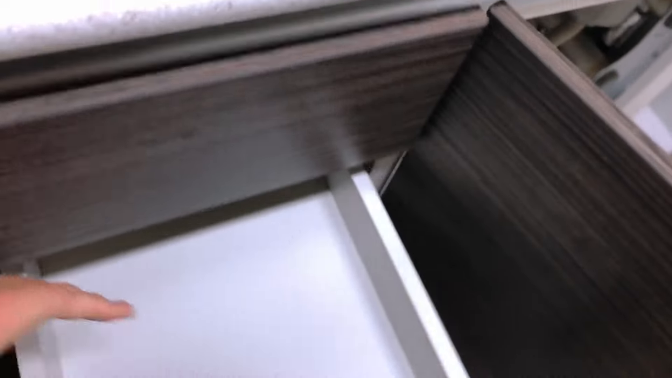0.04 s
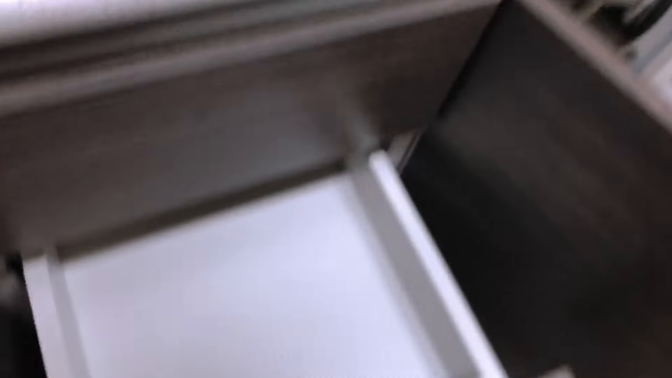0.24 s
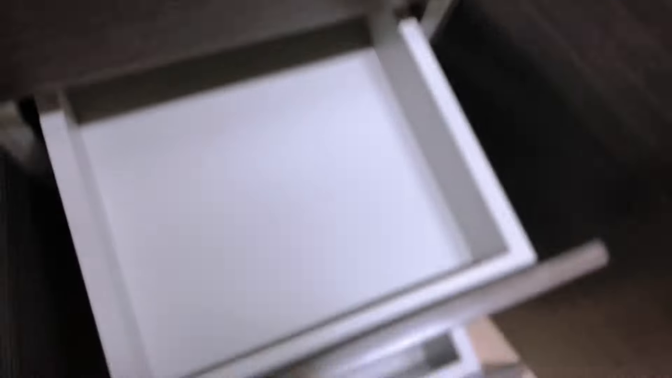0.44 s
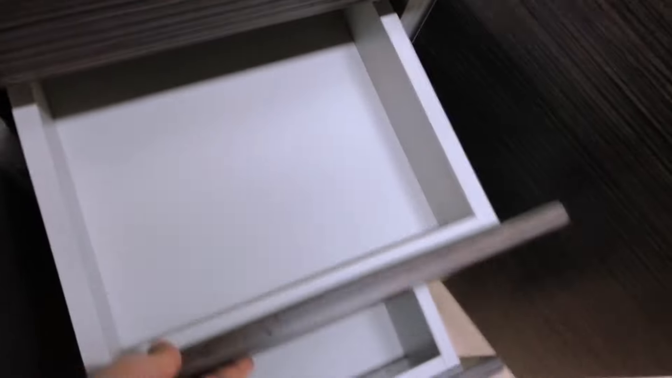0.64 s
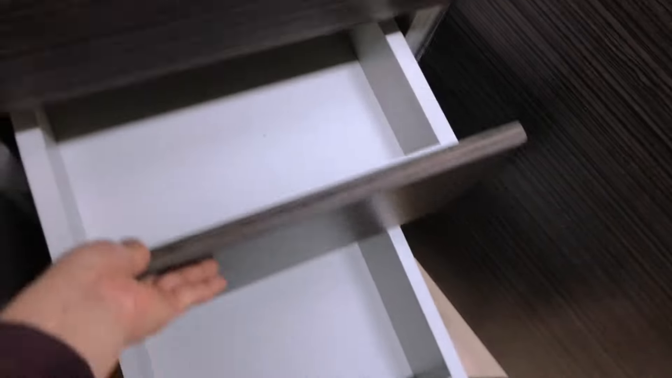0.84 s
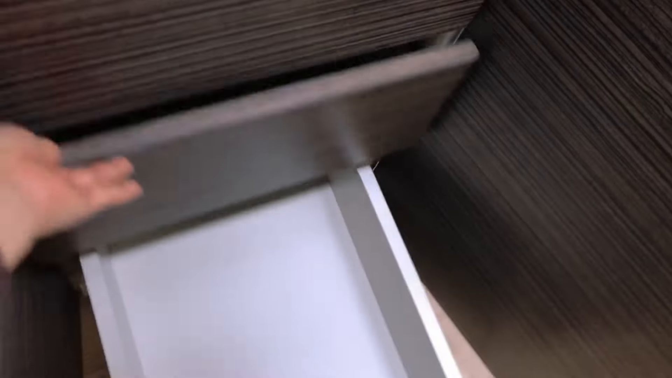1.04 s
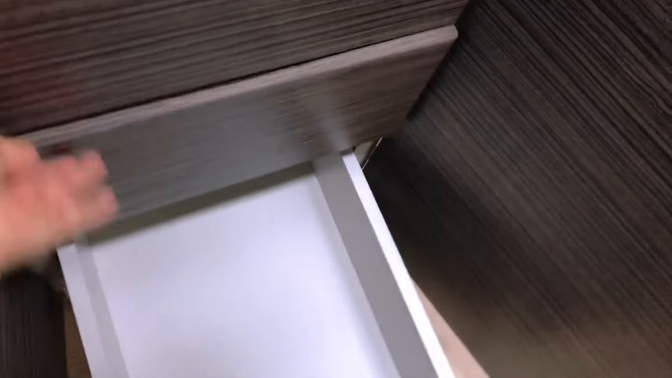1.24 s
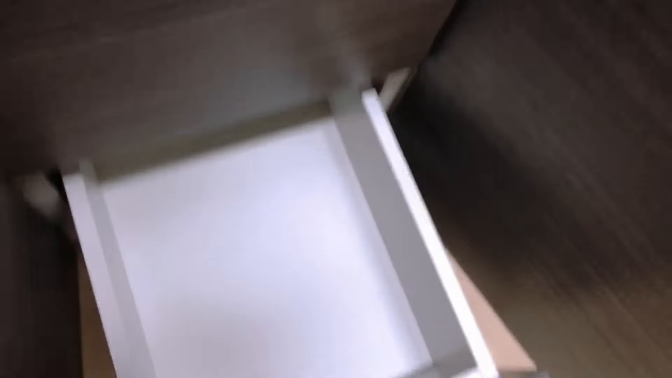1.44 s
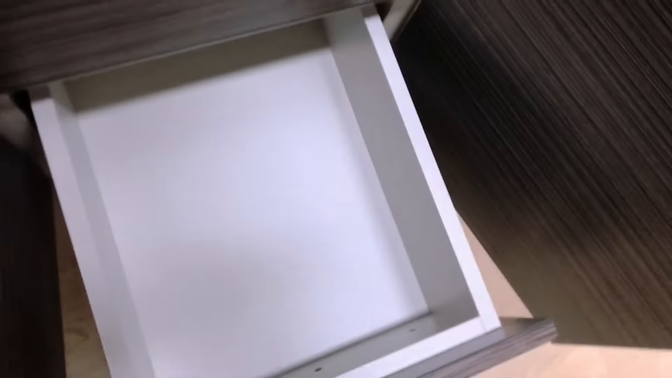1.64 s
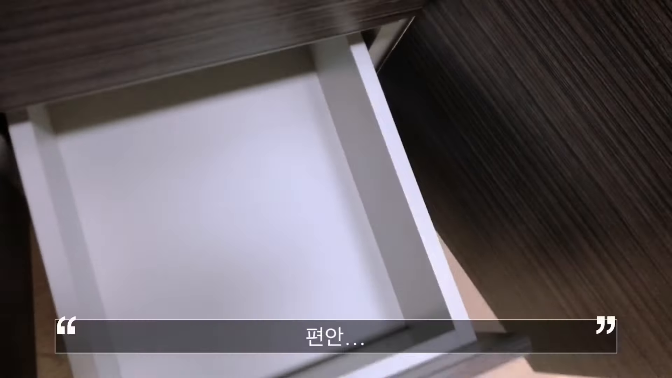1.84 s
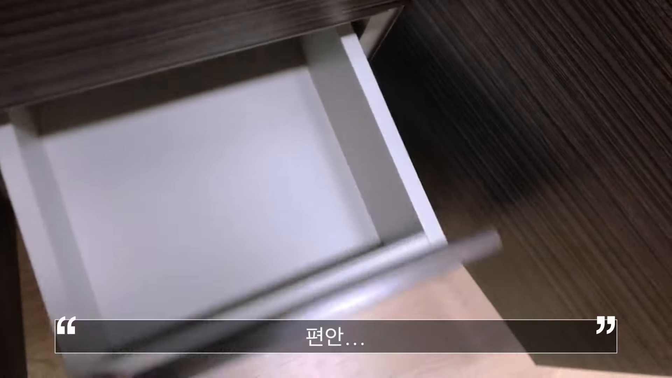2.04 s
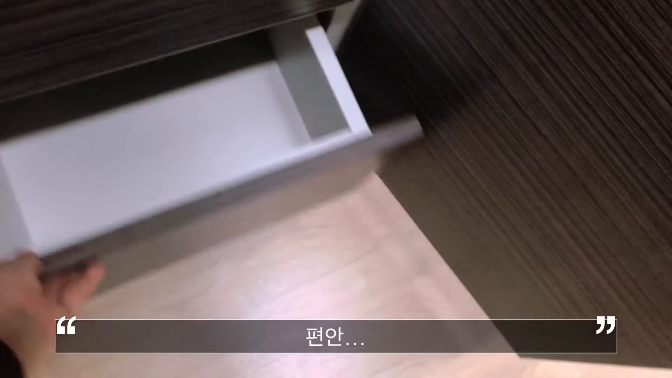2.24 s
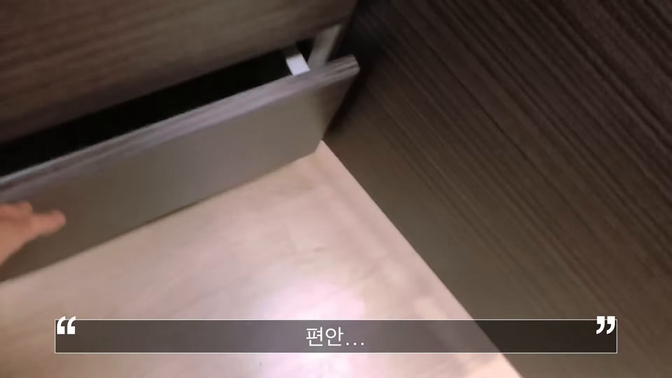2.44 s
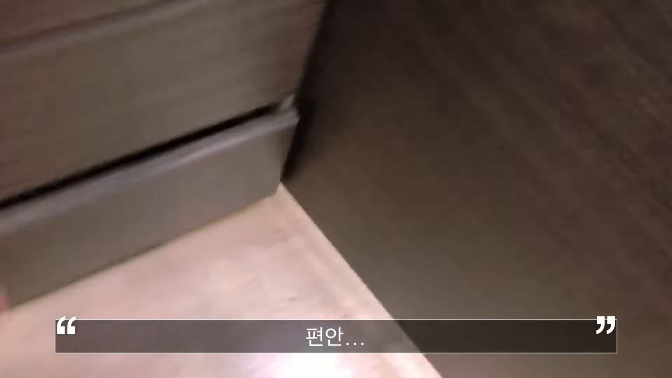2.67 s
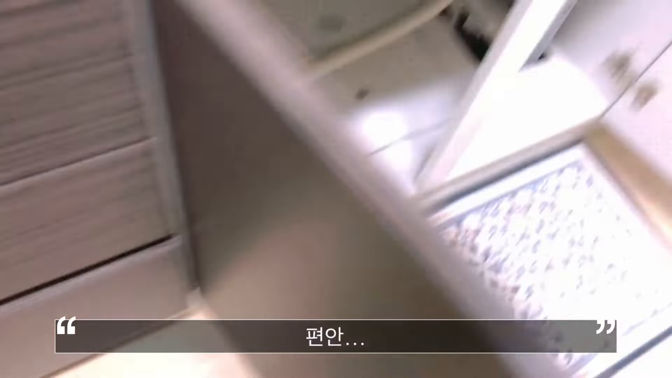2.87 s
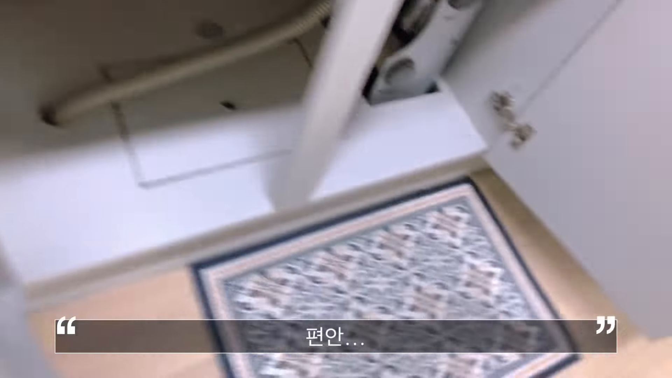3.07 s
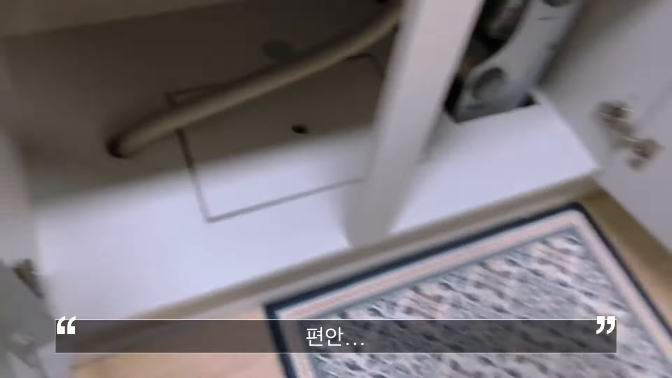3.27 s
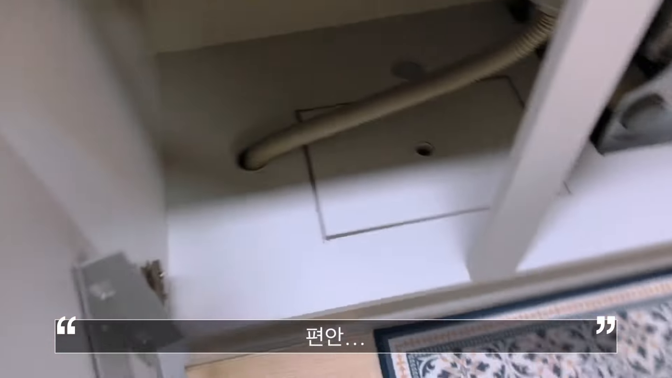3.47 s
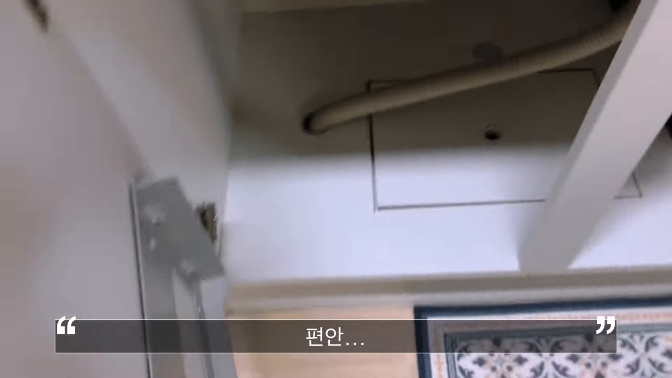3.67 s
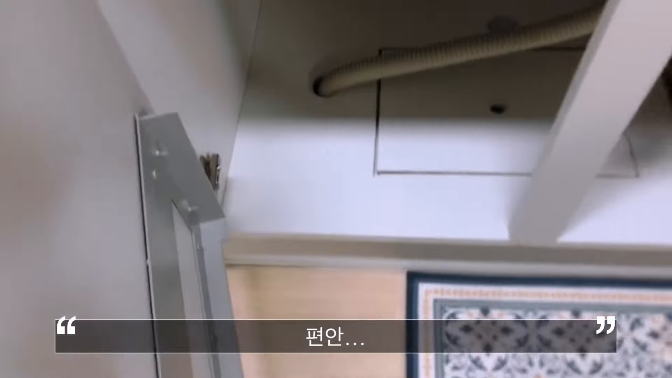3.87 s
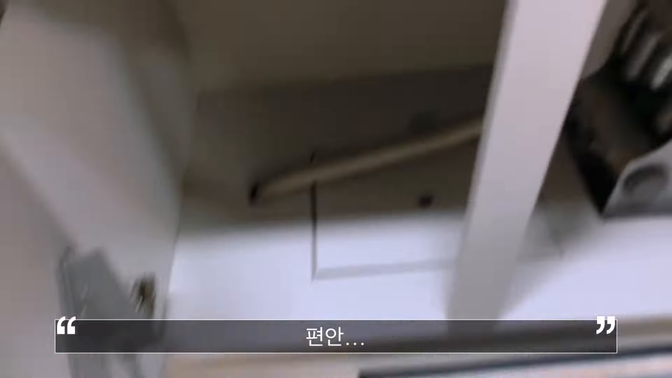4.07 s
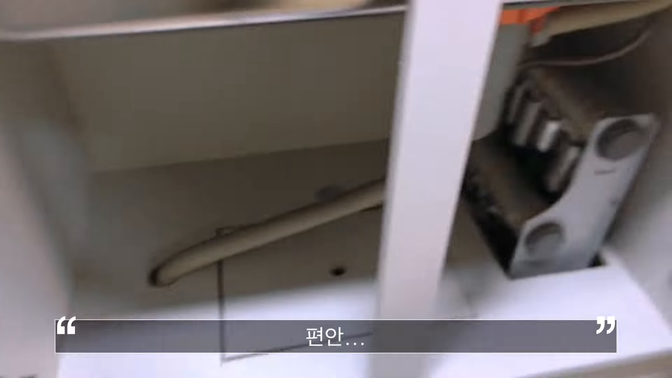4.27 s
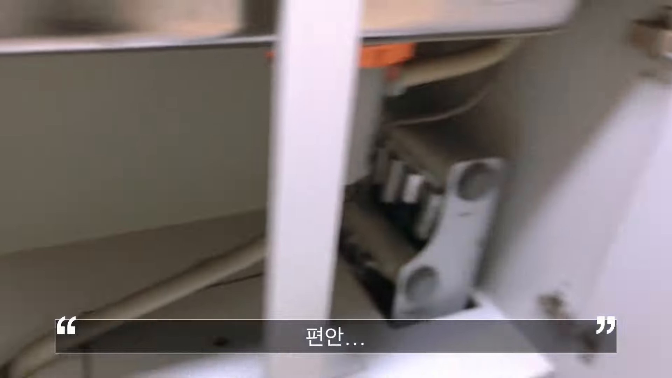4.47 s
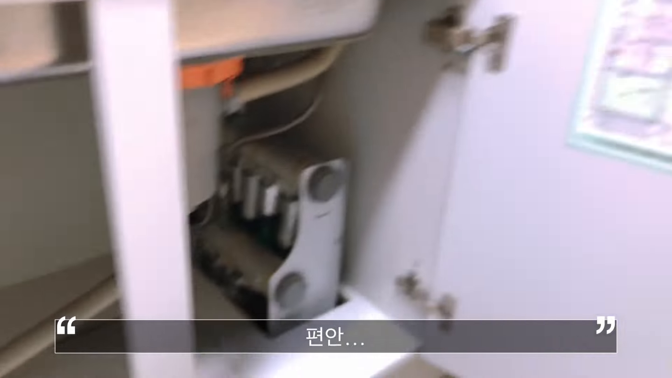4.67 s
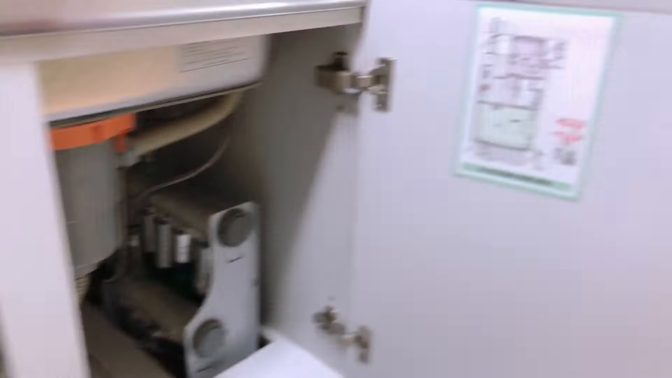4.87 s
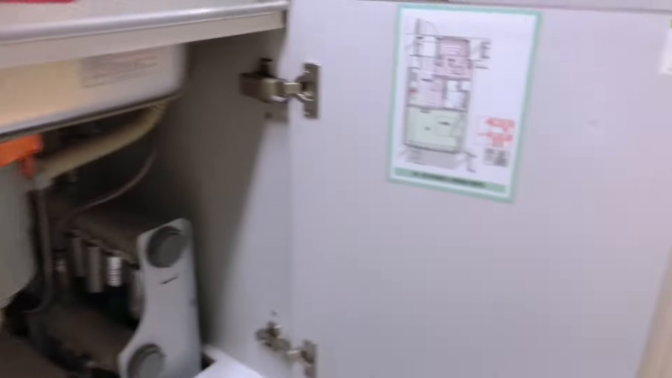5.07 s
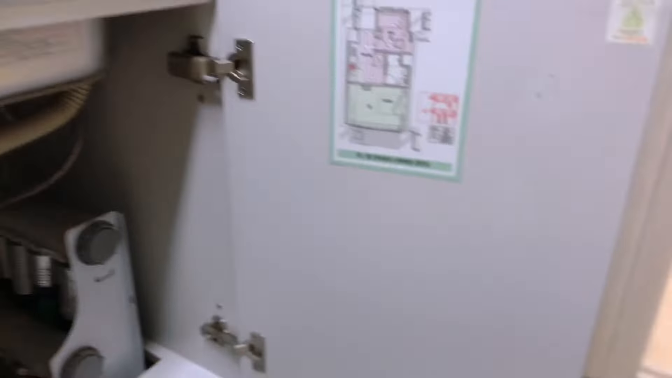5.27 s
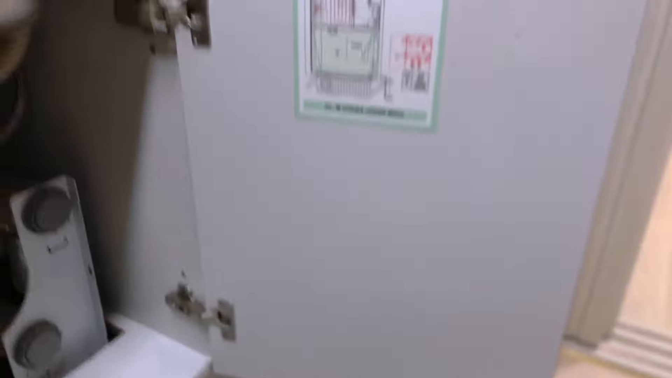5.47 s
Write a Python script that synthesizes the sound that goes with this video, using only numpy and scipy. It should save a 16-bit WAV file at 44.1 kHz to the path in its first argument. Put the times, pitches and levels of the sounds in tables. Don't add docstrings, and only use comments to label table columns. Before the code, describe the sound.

Close to the microphone, an empty wooden drawer slams shut at once. A second rolls in with ticks and bumps and bangs; a third jolts and rattles along its metal rail before a hard final slam. A cupboard door then clacks open, and soft slipper scuffs fade over a hard floor. Bare kitchen walls add a short tail above faint appliance hum.

```python
import sys
import numpy as np
from scipy import signal
from scipy.fft import rfft, irfft
from scipy.io import wavfile
from scipy.ndimage import uniform_filter1d

SR = 44100
rng = np.random.default_rng(int(sys.argv[2]) if len(sys.argv) > 2 else 0)


def dump_mix(stems):
    frames = np.atleast_2d(stems).T
    limited = np.clip(frames, -1, 1)
    pcm = np.round(limited * 32767).astype(np.int16)
    wavfile.write(sys.argv[1], SR, pcm)


def voltage_ratio(decibels):
    exponent = np.asarray(decibels, float) / 20
    return 10 ** exponent


N = 242991

# freq_hz, density_db
ROOM_TONE = [(20, -14.5), (46, 4.5), (155, -14), (410, -10), (480, -20), (1750, -23.5), (3500, -36),
             (15500, -50)]
ROOM_TONE_DB = -49
# freq_hz, level_db
HUM_LINES = [(180, -69), (201, -66), (258, -72), (304, -69), (405, -71), (609, -71), (1028, -78)]
# time_s, level_db
WHINE_LEVEL = [(0.1, -79), (4.4, -77), (4.6, -74), (5.3, -76)]
WHINE_HZ = 2584
# freq_hz, t60_s
ROOM_DECAY = [(60, 0.23), (150, 0.31), (400, 0.34), (1000, 0.29), (2000, 0.31), (4000, 0.22), (7500, 0.25),
              (13500, 0.21)]
ROOM_DB = -8.5

# freq_hz, density_db
FRICTION = [(710, -42.5), (1200, -15), (1640, -3), (2860, -3.5), (3220, -4), (9310, -8.5), (14700, -16),
            (16000, -12)]
# start_s, peak_db, rise_s, hold_s,
# dull_db
SCUFFS = [(0, -62.5, 0.0047, 0.07, 13.5), (0.538, -69, 0.02, 0.25, 9.5), (.8, -63, .015, 0.36, 14.5),
          (1.142, -51.5, 0.0026, 0.0068, -11), (1.528, -57, 0.085, 0.087, -1.5),
          (1.808, -66, 0.025, 0.055, -12), (1.933, -66, 0.02, 0.12, -15),
          (2.504, -56, 0.0039, 0.032, 17.5), (2.926, -65, 0.047, 0.084, -1),
          (3.149, -47.5, 0.019, 0.056, -1), (3.27, -67.5, 0.0078, 0.065, 4), (3.352, -58, 0.019, 0.028, -5),
         (3.457, -59.5, 0.011, 0.074, -1), (3.564, -63.5, 0.0086, .012, -2),
         (3.82, -65.5, 0.011, 0.098, 2.5), (4.036, -48, 0.039, 0.057, -1.5), (4.223, -61, 0.021, 0.041, 4),
         (4.32, -67, 0.03, 0.28, -2), (4.687, -71, 0.02, 0.23, 4), (4.91, -67, 0.042, 0.034, 1.5),
         (5.017, -72, 0.026, .1, 3), (5.294, -71.5, 0.048, 0.13, 11)]
FALL_S, FALL_PER_RISE = 0.043, 1.9

# start_s, level_db, centre_hz, air_db, t60_s
TICKS = [(0.04, -32.5, 3000, -70, 0.057), (0.264, -35, 2550, -49, 0.1),
         (0.3173, -37, 2450, -48.5, 0.11), (0.5453, -52, 2200, -59, 0.12),
         (0.595, -37, 3100, -47.5, 0.11), (0.633, -48, 2520, -48.5, 0.099),
         (0.7102, -48, 2590, -53, 0.58), (0.756, -30.5, 3100, -48, 0.16),
         (0.833, -24.5, 2250, -29.5, 0.085), (0.8888, -49, 3120, -36.5, 0.063),
         (0.9164, -22, 2350, -31, 0.14), (0.991, -38, 2480, -44.5, 0.18),
         (1.042, -24, 3100, -30, 0.17), (1.4545, -26, 2260, -37, 0.096),
         (2.0741, -28.5, 3720, -41, 0.11), (2.147, -39, 4500, -68, 0.059),
                (2.1842, -39, 4400, -32.5, 0.091), (2.2514, -28, 3670, -39.5, 0.12),
                (2.267, -29.5, 2670, -58, 0.19), (2.314, -36, 4500, -48, 0.12),
                (2.3303, -30.5, 3900, -36.5, 0.11), (2.5094, -43, 2260, -56, 0.33),
                (2.892, -46, 2150, -52.5, 0.94),
         (3.196, -39, 2880, -73.5, 0.17), (3.8204, -55, 2590, -62, 0.16), (4.493, -45, 1900, -81.5, 0.11),
         (5.295, -46, 2460, -75, 0.087), (5.349, -47.5, 2240, -77, 0.2), (5.4126, -38.5, 2820, -80, 0.11)]
# start_s, level_db
SNAPS = [(2.4787, -30), (3.1525, -41)]

# start_s, length_s, start_db, end_db, grit_over_rumble_db
TRAVELS = [(0, 0.15, -38, -51, -11.5), (0.161, 0.14, -59, -35.5, -10.5), (0.55, 0.16, -44, -44.5, -17),
           (0.707, 0.1, -39.5, -39.5, -17), (0.819, 0.32, -39.5, -38.5, -19.5), (1.47, 0.18, -60, -76, -21),
           (1.874, 0.095, -45, -36.5, -10.5), (1.972, 0.26, -40.5, -43, -4.5), (2.249, .16, -44, -45, -3.5),
           (2.427, 0.13, -48.5, -48.5, -10), (2.938, 0.19, -57, -62, -16)]
TRAVEL_EDGE_S, TRAVEL_BOOM_DB = 0.048, -6.5
SHUDDER_BOOM_DB, SHUDDER_RUMBLE_DB, SHUDDER_RAIL_DB = -17.5, -30, -26.5
BOOM_T60_S, SHUDDER_T60_S = 0.97, 0.54
# freq_hz, width_hz, gain_db
CABINET = [(42.7, 12, 5.5), (82.8, 33.6, 8.5), (120, 70, -3)]
# freq_hz, width_hz, gain_db
CARCASS = [(170, 46, 3.5), (257, 107, -1), (375, 18, 1), (430, 58, -9), (574, 220, -13.5)]
# freq_hz, width_hz, gain_db
RAIL = [(880, 91, -1), (1130, 37, -0.5), (1520, 350, -9.5), (2220, 45, 4.5), (2450, 62, -4.5),
        (3000, 520, -8), (4380, 960, -16)]
# time_s, freq_hz
RAIL_SPAN = [(0, 1420), (1.87, 1380), (2.086, 1460), (2.125, 1195), (2.165, 1230), (2.206, 1360),
             (2.284, 1304), (2.38, 1520), (2.45, 1400)]
SPAN_WIDTH_HZ, SPAN_DB = 74, 7.5
FLECKS_PER_S, FLECK_DB = 400, 19
# start_s, peak_db, freq_hz, t60_s
SWELLS = [(0.721, -34.5, 221.8, 0.4), (0.866, -28.5, 100, 0.1), (0.926, -27.5, 91.4, 0.22),
          (0.93, -34, 182, 0.13), (0.93, -43, 655, .15), (0.985, -31.5, 182, .15), (1.02, -47, 660, .12),
          (1.044, -33, 120, .15), (1.33, -33, 54, .6), (1.47, -33, 54, .3), (1.894, -37, 86, 0.23),
          (1.923, -32.5, 202.5, 0.22), (1.956, -38, 355, 0.075), (1.962, -35, 92, 0.19),
          (2.012, -31.5, 370, 0.12), (2.071, -33, 263, 0.1), (2.085, -29.5, 173, .13),
          (2.131, -32, 81.2, 0.25), (2.172, -28.5, 80.7, 0.27), (2.175, -37.5, 430, .13),
          (2.262, -33.5, 209, 0.11), (2.265, -27.5, 77.5, 0.14), (2.279, -36, 368.5, 0.23),
          (2.37, -33, 214, 0.11), (2.385, -33, 170, .1), (2.427, -35, 100, 0.1), (2.458, -33, 87, 0.18)]
SWELL_RISE_S = 0.021

# freq_hz, width_hz, gain_db
CATCH = [(643, 37, -4.5), (2350, 40, 0.5), (2700, 80, -4), (3110, 60, -8), (3870, 80, -6), (4540, 120, 0),
         (5750, 300, -12)]
LATCH = [(1350, 89, -6), (3010, 64, 1.5), (3400, 160, 3), (3700, 79, -5), (5490, 100, -9), (6400, 300, -9)]
ROLLER = [(2060, 120, 3), (3420, 83, -7), (4160, 100, -9), (4600, 82, 3), (6440, 210, -24)]
BRACKET = [(2300, 83, -1), (2780, 100, 1), (3160, 90, 0), (3830, 90, -5), (5300, 100, -16)]
CLIP = [(1890, 98, -6), (3380, 110, -2), (3830, 80, 0), (5500, 100, -13), (6420, 110, -1.5)]
PARTS = [CATCH, LATCH, ROLLER, BRACKET, CLIP]
# start_s, level_db, rebound_s
PINGS = [
    (0.9171, -29.5, 0.008),
    (1.0415, -29.5, .005),
    (2.1852, -32, .003),
    (2.268, -34, .007),
    (2.33, -32.5, .006),
]

# start_s, level_db, brightness_db, rail_hz
JOLTS = [(1.6307, -31, -9, 1460), (1.747, -16, -4, 1460), (1.7778, -20, -5, 1410),
         (1.8074, -20.5, -4, 1520), (1.8341, -20.5, -6.5, 1470), (1.9123, -27, -5.5, 1500),
         (1.9394, -35, -23, 1440), (1.9465, -27, -4.5, 1460), (1.957, -28, -20, 1500),
         (1.9835, -33, -4.5, 1460), (2.0155, -34, -24, 1520), (2.051, -34, -12, 1540),
         (2.0791, -26.5, -4, 1470), (2.1192, -32, -11.5, 1200), (2.148, -29, -7, 1140),
         (2.1932, -27, -6.5, 1370), (2.2205, -31, -10, 2150), (2.2685, -32, -2, 1290),
         (2.3149, -40, -4, 1500), (2.3743, -34, -12, 1540), (2.378, -31, -8, 2230)]
# freq_hz, width_hz, gain_db
WHEEL = [(188, 30, 2), (362.2, 9.6, 10.5), (852, 33, -3.5), (2170, 55, 4), (2810, 140, -0.5), (3014, 69, 4),
         (3540, 320, -5), (4500, 850, -17.5), (6540, 900, -24.5)]
RAIL_WIDTH_HZ, RAIL_DB = 102, 3

# start_s, peak_db, freq_hz, # t60_s
THUDS = [(0.0991, -5.5, 145, 0.074), (0.13, -27, 150, 0.08), (0.806, -16, 120.3, 0.103),
         (0.97, -13.5, 125, 0.025), (1.16, -8, 295, 0.097), (1.4, -28, 88, 0.13), (1.205, -13, 132, 0.066),
         (1.233, -19, 134, 0.046), (1.232, -31, 354, 0.04), (1.286, -29, 110, 0.17), (3.6, -36, 71, 0.1),
         (2.562, -15, 158, 0.11), (2.56, -6, 275, 0.046), (0.0924, -16, 400, 0.054),
         (0.0895, -13, 1460, 0.1), (0.097, -20, 630, 0.1), (0.113, -20, 95, 0.15),
         (1.1575, -17, 1445, 0.09), (1.1605, -15, 415, 0.1), (1.441, -27, 250, 0.1), (1.442, -29, 400, 0.1),
         (0.561, -33, 120, 0.088), (5.439, -44.5, 177, 0.26), (2.4, -21, 107, 0.067),
         (2.62, -25.5, 285, 0.12), (2.699, -28, 127, 0.14)]
# freq_hz, width_hz, gain_db
TOP_FRONT = [(140, 48, -24), (370, 47, 1), (482, 62, -0.5), (630, 27, -0.5), (900, 77, -10.5),
             (1460, 69, 3), (1890, 87, -16), (2260, 90, -14), (2500, 52, -5.5), (3230, 250, -32),
             (4500, 560, -13.5)]
TOP_STOP = [(146, 710, -7.5), (400, 15, -20), (874, 13, 2), (1516, 22, 12), (2400, 98, -20),
            (4800, 25, -17)]
MIDDLE_GRIP = [(134, 96, -4.5), (460, 13, 3), (961, 18, -3.5), (1900, 150, -9.5), (2590, 28, -7.5),
               (3100, 47, -31), (4180, 27, -12)]
MIDDLE_FRONT = [(191, 70, -6.5), (410, 30, 0), (520, 57, -3), (655, 50, -7.5), (940, 120, -3.5),
                (1440, 100, -4.5), (1906, 70, -7), (2180, 75, -10), (2350, 42, -26), (3400, 31, -30.5),
                (3490, 32, -12.5), (3850, 21, -36), (4180, 410, -15)]
MIDDLE_STOP = [(100, 10, 1), (257, 60, 0), (1170, 33, -6), (1546, 56, -8), (2290, 44, -11),
               (3000, 78, -11.5), (3600, 25, -12)]
BOTTOM_GRIP = [(357, 23, -13.5), (1420, 100, -21), (3150, 130, -34), (3900, 97, -31)]
BOTTOM_FRONT = [(154, 44, -19), (340, 46, -10), (480, 100, -13.5), (713, 22, -3), (916, 150, -15.5),
                (1420, 120, -12.5), (1880, 190, -11), (2060, 113, -1.5), (2240, 88, -3.5), (3030, 140, -21)]
DOOR = [(287, 7.5, 2), (485.5, 4.3, 3), (869, 47, -5.5), (1670, 67, -1.5), (2150, 19, -7), (2480, 71, -2.5),
        (3050, 210, -9), (3330, 57, -10.5), (5150, 240, -18.5)]
HINGE = [(1030, 35, 1), (1730, 48, 1.5), (1930, 55, -1), (2260, 27, -4), (3020, 94, -4)]
PANELS = [TOP_FRONT, TOP_STOP, MIDDLE_GRIP, MIDDLE_FRONT, MIDDLE_STOP,
          BOTTOM_GRIP, BOTTOM_FRONT, DOOR, HINGE]
# start_s, ring_db, thump_db, clack_db, crack_db
KNOCKS = [
    (0.0889, -3, -22, -12, -9),
    (0.352, -20.5, -30, -32, -39),
    (0.796, -12, -26, -19, -20),
    (1.157, -3, -19, -12, -14),
    (1.44, -19, -30, -29, -40),
    (1.731, -21, -36, -47, -39),
    (2.5561, -3, -13, -17, -8.5),
    (2.9323, -13, -31, -29, -29.5),
    (3.017, -26.5, -57, -52, -66.5),
]
CHATTER_T60_S = 0.093


def to_rms(x, db):
    return x * voltage_ratio(db) / np.sqrt(np.mean(x ** 2))


def to_peak(x, db):
    return x * voltage_ratio(db) / np.max(np.abs(x))


def band(x, lo_hz, hi_hz):
    sos = signal.butter(2, [lo_hz, min(hi_hz, .45 * SR)], "band", fs=SR, output="sos")
    return signal.sosfilt(sos, x)


def ring(x, modes):
    out = 0
    for k, (hz, width_hz, db) in enumerate(modes):
        r = np.exp(-np.pi * width_hz / SR)
        poles = [1, -2 * r * np.cos(2 * np.pi * hz / SR), r * r]
        out = out + (-1) ** k * voltage_ratio(db) * signal.lfilter([1 - r, 0, r - 1], poles, x)
    return out


def glide(x, hz, width_hz):
    turn = np.exp(2j * np.pi * np.cumsum(hz) / SR)
    r = np.exp(-np.pi * width_hz / SR)
    return 2 * np.real(signal.lfilter([1 - r], [1, -r], x / turn) * turn)


def colour(points):
    hz, db = np.transpose(points)
    gain = voltage_ratio(np.interp(np.log(np.fft.rfftfreq(N, 1 / SR) + 1), np.log(hz), db))
    return to_rms(irfft(rfft(rng.standard_normal(N)) * gain, N), 0)


def walk(rate_hz):
    k = int(SR / rate_hz)
    steps = np.repeat(rng.standard_normal(N // k + 1), k)
    return 1.82 * uniform_filter1d(uniform_filter1d(steps, k), k)[:N]


def fade(t60_s, size=16384):
    return voltage_ratio(-60 * np.arange(size) / SR / max(t60_s, .003))


def tone(hz):
    return np.sin(2 * np.pi * hz * np.arange(16384) / SR)


def add(out, x, start_s):
    i = int(start_s * SR)
    out[i:i + len(x)] += x[:N - i]


def curve(table):
    s, *columns = np.transpose(table)
    return [np.interp(np.arange(N) / SR, s, c) for c in columns]


def flat():
    t = np.arange(N) / SR
    air = colour(ROOM_TONE)
    bass = band(air, 36, 140)
    hum = np.zeros(N)
    for hz, db in HUM_LINES:
        gain = voltage_ratio(db + 3.5 + 2.0 * walk(5.4))
        hum += gain * np.sin(2 * np.pi * (hz * t + 0.2 * walk(7)))
    whine_gain = voltage_ratio(curve(WHINE_LEVEL)[0] + 6.0 + 1.4 * walk(6.2))
    hum += whine_gain * np.sin(2 * np.pi * WHINE_HZ * t)
    return to_rms(air + bass * (voltage_ratio(2.2 * walk(4.5)) - 1), ROOM_TONE_DB - 1.5) + hum


def room(x):
    out, build = 0, np.exp(-1 / (0.002 * SR))
    decay_hz, decay_s = np.transpose(ROOM_DECAY)
    for hz in 50 * 2 ** np.arange(0, 8.3, 1 / 3):
        t60_s = np.interp(np.log(hz), np.log(decay_hz), decay_s)
        linger = 10 ** (-6 / (t60_s * SR))
        edges_hz = hz / 2 ** (1 / 6), hz * 2 ** (1 / 6)
        poles = np.convolve([1, -linger], [1, -build])
        energy = signal.lfilter([(1 - linger) * (1 - build)], poles, band(x, *edges_hz) ** 2)
        wash = to_rms(band(rng.standard_normal(N), *edges_hz), 0)
        out = out + np.sqrt(np.abs(energy)) * wash
    return out * voltage_ratio(ROOM_DB)


def scuffs():
    t, out = np.arange(N) / SR, 0
    hiss = colour(FRICTION)
    dull = band(hiss, 1100, 4300)
    for s, db, rise_s, hold_s, dull_db in SCUFFS:
        times_s = s + np.cumsum([0, rise_s, hold_s, FALL_S + FALL_PER_RISE * rise_s])
        shape_db = np.interp(t, times_s, [-15, -2, -1.5, -37.5], left=-200, right=-200)
        out = out + voltage_ratio(db + shape_db + 2.0) * (hiss + (voltage_ratio(dull_db) - 1) * dull)
    return out * voltage_ratio(0.94 * walk(71))


def ticks():
    out = np.zeros(N)
    for s, db, hz, air_db, t60_s in TICKS:
        a, b = rng.standard_normal((2, 16384)) * fade(t60_s) * (1 + 1.8 * fade(0.011))
        broad = [(hz, 0.58 * hz, 0)]
        body = to_peak(ring(ring(a, broad), broad), db - 3.5)
        add(out, body + to_peak(band(b, 3200, 12000), air_db + 4.5), s)
    for s, db in SNAPS:
        add(out, voltage_ratio(db) * np.array([1.2]), s)
    return out


def rolling():
    t = np.arange(N) / SR
    boom_gain, rumble_gain, hiss_gain = np.zeros((3, N))
    for s, length_s, from_db, to_db, grit_db in TRAVELS:
        edge = np.clip(np.minimum(t - s, s + length_s - t) / TRAVEL_EDGE_S + .5, 0, 1)
        speed = edge * voltage_ratio(np.interp(t, [s, s + length_s], [from_db, to_db]))
        boom_gain += speed * voltage_ratio(TRAVEL_BOOM_DB)
        rumble_gain += speed
        hiss_gain += speed * voltage_ratio(grit_db)
    for s, _, thump_db, *_ in KNOCKS:
        swell = voltage_ratio(thump_db) * (1 - fade(0.079, size=32768))
        shudder = swell * fade(SHUDDER_T60_S, size=32768)
        add(boom_gain, swell * voltage_ratio(SHUDDER_BOOM_DB) * fade(BOOM_T60_S, size=32768), s)
        add(rumble_gain, shudder * voltage_ratio(SHUDDER_RUMBLE_DB), s)
        add(hiss_gain, shudder * voltage_ratio(SHUDDER_RAIL_DB), s)
    boom = to_rms(ring(rng.standard_normal(N), CABINET), 0.28)
    rumble = to_rms(ring(rng.standard_normal(N) * voltage_ratio(1.6 * walk(25)), CARCASS), -1.5)
    flecks = rng.random(N) < FLECKS_PER_S / SR
    grit = rng.standard_normal(N)
    grit *= voltage_ratio(2.0 * walk(200) + 2.0 * walk(30)) + voltage_ratio(FLECK_DB) * flecks
    span = voltage_ratio(SPAN_DB) * glide(grit, curve(RAIL_SPAN)[0], SPAN_WIDTH_HZ)
    hiss = to_rms(ring(grit, RAIL) + span, 0.54)
    return boom_gain * boom + rumble_gain * rumble + hiss_gain * hiss


def swells():
    out = np.zeros(N)
    for s, db, hz, t60_s in SWELLS:
        add(out, to_peak(tone(hz) * fade(t60_s) * (1 - fade(SWELL_RISE_S)) ** 2, db), s)
    return out


def pings():
    out = np.zeros(N)
    for (s, db, rebound_s), modes in zip(PINGS, PARTS):
        push = 0.14 * rng.standard_normal(4096) * fade(0.1, size=4096)
        push[[0, int(rebound_s * SR)]] += 1.0, .55
        add(out, to_peak(ring(push, modes), db), s)
    return out


def jolts():
    out = np.zeros(N)
    for s, db, bright_db, rail_hz in JOLTS:
        detune = 1 + 0.0067 * rng.standard_normal(len(WHEEL))
        wheel = [(hz * d, width_hz, gain_db + bright_db * np.log2(max(hz, 800) / 1500))
                 for (hz, width_hz, gain_db), d in zip(WHEEL, detune)]
        rail = [(rail_hz, RAIL_WIDTH_HZ, RAIL_DB)]
        push = 0.04 * rng.standard_normal(4096) * fade(0.07, size=4096)
        push[[0, int(.002 * SR), int(.0055 * SR)]] += 1.0, .7, .2
        add(out, to_peak(ring(push, wheel + rail), db - 3.0), s)
    return out


def thuds():
    out = np.zeros(N)
    for s, db, hz, t60_s in THUDS:
        add(out, voltage_ratio(db) * tone(hz) * fade(t60_s) * (1 - fade(0.0045)), s)
    return out


def knocks():
    out = np.zeros(N)
    t60_s = CHATTER_T60_S
    for (s, ring_db, thump_db, clack_db, crack_db), modes in zip(KNOCKS, PANELS):
        a, b, c, d = rng.standard_normal((4, 16384))
        blow = a * (0.32 * fade(t60_s) + 0.3 * fade(0.02))
        blow[:4] += 1.3
        loose = [(hz, width_hz + 0.0091 * hz, db) for hz, width_hz, db in modes]
        thump = b * (1 - fade(0.012)) * fade(1.84 * t60_s)
        clack = c * (1 + 1.8 * fade(0.0091)) * fade(1.24 * t60_s)
        crack = d * (fade(0.38 * t60_s) + 0.15 * fade(2.2 * t60_s))
        sound = to_peak(ring(blow, loose), ring_db - 3.0)
        sound += to_peak(band(thump, 45, 360), thump_db + 1.5)
        sound += to_peak(band(clack, 950, 4500), clack_db + 5.5)
        sound += to_peak(band(crack, 3500, 7600), crack_db - 3)
        sound += to_peak(band(a * fade(1.04 * t60_s), 7700, 14000), crack_db - 11.0)
        add(out, sound, s)
    return out


def scene():
    near = knocks() + thuds() + swells() + jolts() + pings() + ticks() + rolling() + scuffs()
    return (near + room(near) + flat())[None]


def roll_off(x):
    return signal.sosfilt(signal.butter(12, 16550, fs=SR, output="sos"), x)


def record(dry):
    low_cut = signal.butter(3, 34, "high", fs=SR, output="sos")
    top_cut = signal.cheby2(8, 22, 16100, fs=SR, output="sos")
    limited = 0.5 * np.tanh(signal.sosfilt(low_cut, dry) / 0.56)
    return roll_off(signal.sosfilt(top_cut, limited))


dry = scene()
out = record(dry)
dump_mix(out)
```